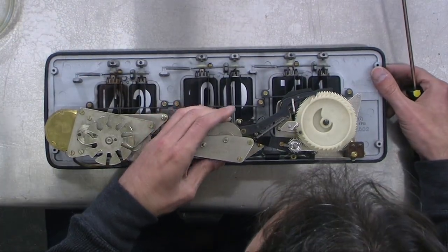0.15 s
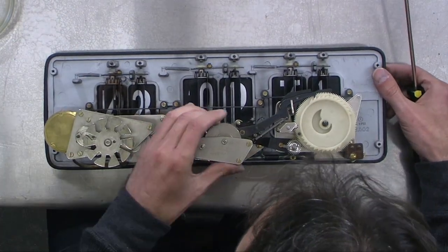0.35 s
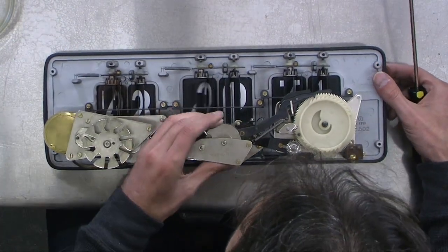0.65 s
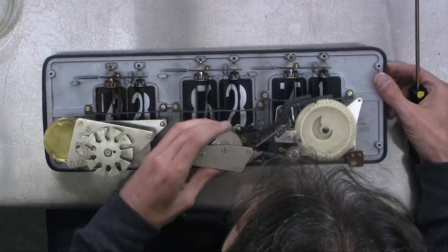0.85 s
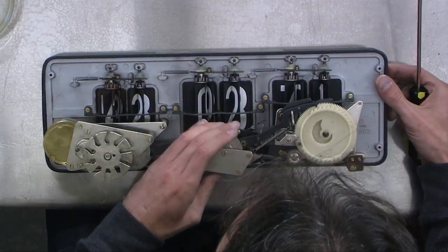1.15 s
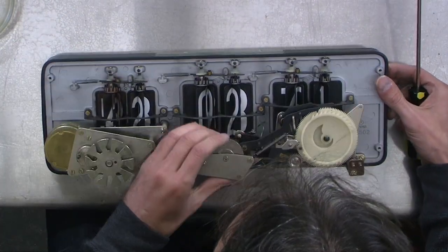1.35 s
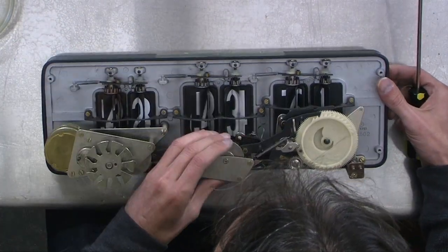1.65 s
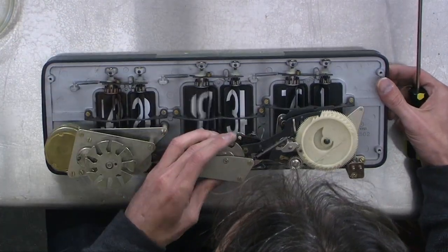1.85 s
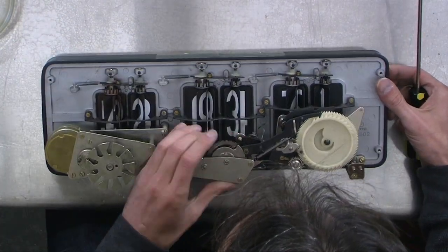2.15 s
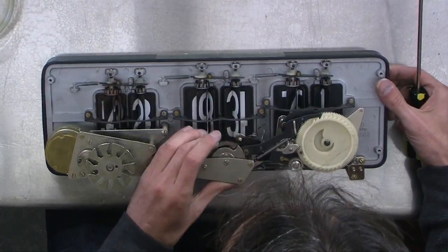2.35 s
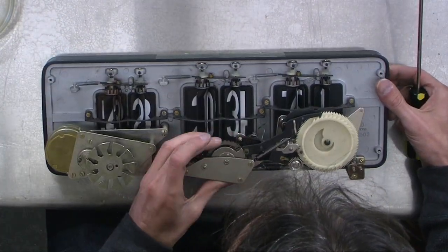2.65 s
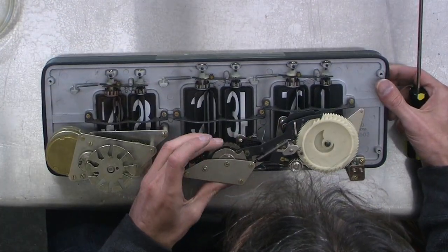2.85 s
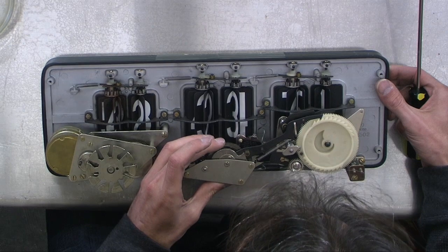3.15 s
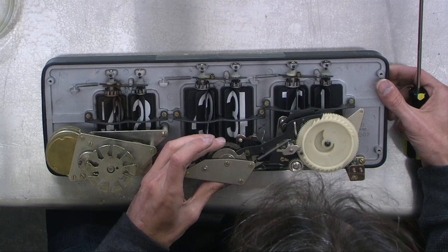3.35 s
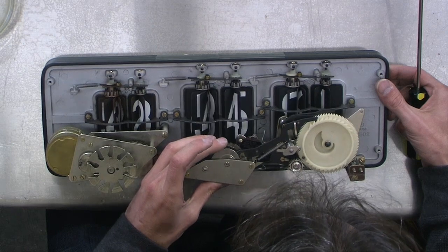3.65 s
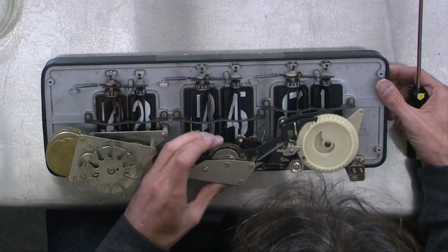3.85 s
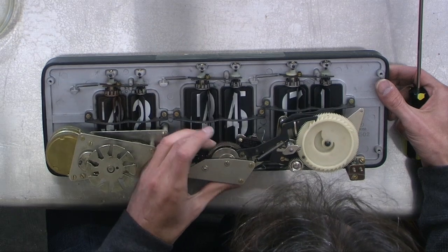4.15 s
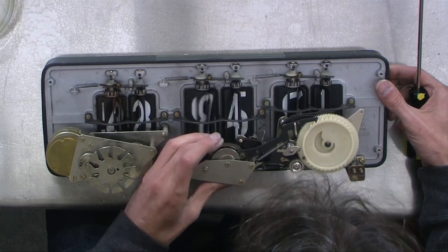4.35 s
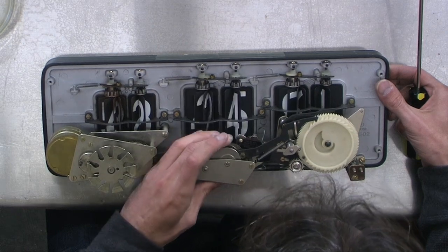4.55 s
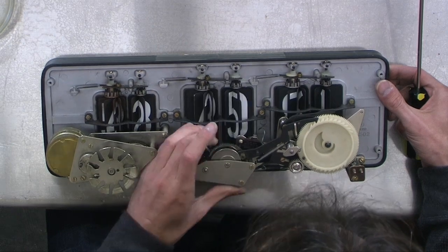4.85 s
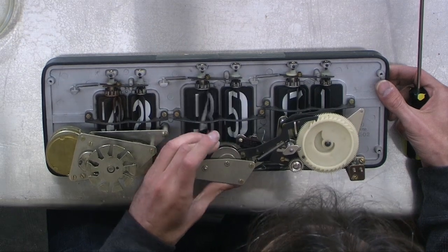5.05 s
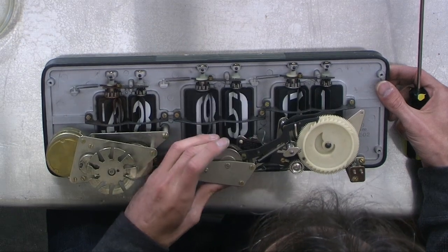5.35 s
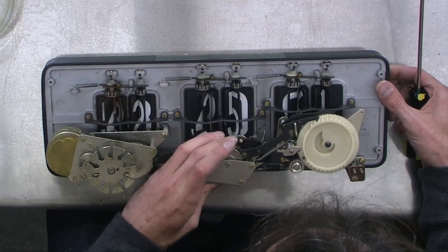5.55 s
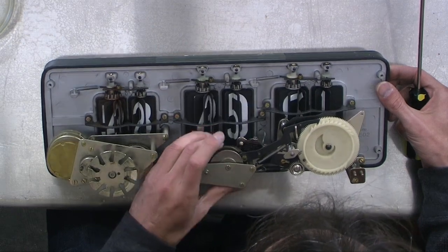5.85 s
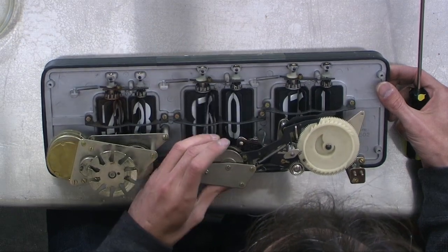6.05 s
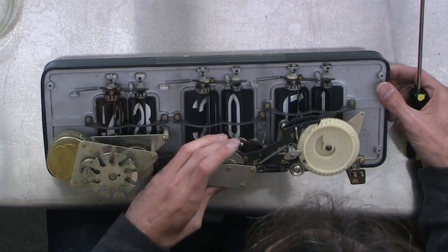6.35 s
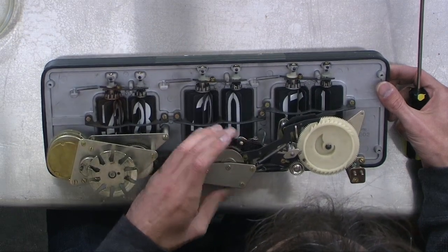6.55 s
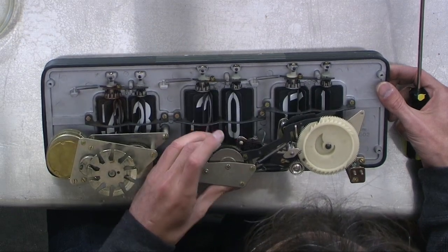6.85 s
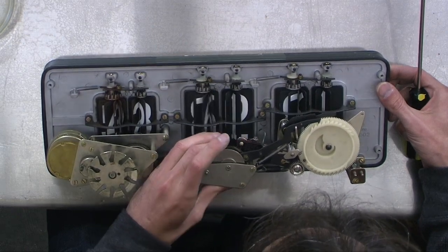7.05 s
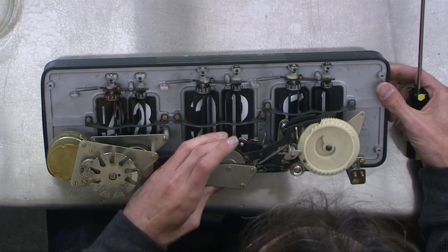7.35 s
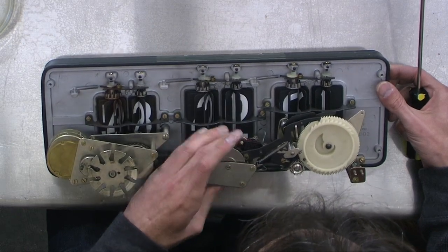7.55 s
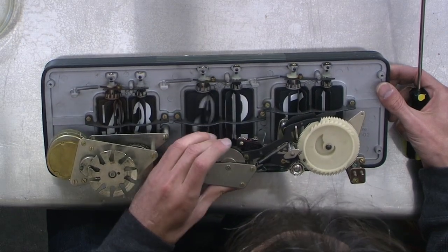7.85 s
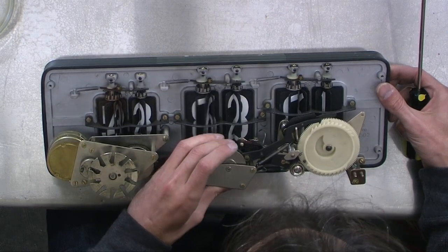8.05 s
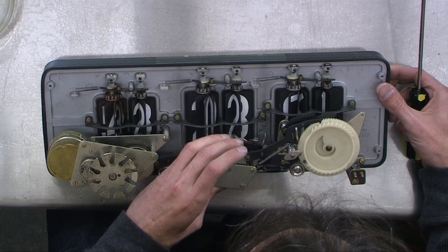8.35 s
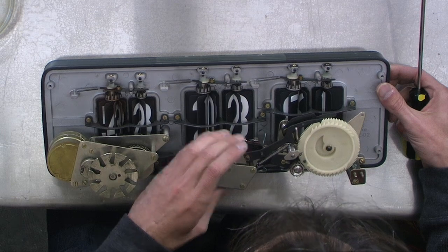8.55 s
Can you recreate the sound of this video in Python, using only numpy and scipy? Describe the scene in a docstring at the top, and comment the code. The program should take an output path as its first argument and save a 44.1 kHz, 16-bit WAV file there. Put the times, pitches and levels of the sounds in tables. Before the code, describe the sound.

Close up, an old flip clock is turned by hand in about eight short spurts. Each one is a rapid run of sharp ticks and light knocks, as cards snap free and land over rattling gears. After the third, shorter spurt, a lever drops with a single hollow clack, and then the spurts resume regularly. Faint hum and hiss of a lively room fill the brief pauses.

```python
"""Short bursts of rattling and clicking: a hand spins the setting wheel of an open split-flap clock.
Gears and levers rattle, cards snap off their stop and land, and once a big lever clacks.
Each blow ticks in the thin parts, knocks in the frame and leaves a slow, deep swing.
The clock stands on a table in a lively room with a faint hum."""
import sys
import numpy as np
from scipy import signal
from scipy.fft import rfft, irfft
from scipy.io import wavfile

SR = 44100
rng = np.random.default_rng(int(sys.argv[2]) if len(sys.argv) > 2 else 0)


def wav_out(sig):
    """Save sig, one row per channel (or a flat mono array), as 16-bit PCM at SR to the path in sys.argv[1]."""
    wavfile.write(sys.argv[1], SR, np.round(np.clip(np.atleast_2d(sig).T, -1, 1) * 32767).astype(np.int16))


N = 383810

# The tones (modes) that cards, springs and levers ring at:
# f/Hz, width/Hz, level/dB, boost with contact time/(dB per ms)
TICK_MODES = [(2440, 354, -14, 3), (2924, 925, -7, 3), (4210, 535, -13.5, 3), (4720, 476, -8.5, 1.1),
              (5415, 730, -0.5, 0.45), (6010, 900, 0.5, 0.43), (7526, 590, 4, -0.09), (8440, 570, 0, 1.05),
              (9500, 920, -1.5, 2), (9930, 416, -5.5, 2), (11800, 1320, 1, 2.5)]
# The tones of the frame; the three narrow ones are the long, faint ring of the back plate:
# f/Hz, width/Hz, level/dB, boost with hollowness/(dB per dB)
KNOCK_MODES = [(314, 22.6, -27, 0.27), (603, 147, -13.5, -0.04), (640, 150, -8, 0), (971, 135, -1.5, 1.17),
               (945, 3, -39, 1.4), (972, 2.5, -36, 1.4), (1000, 3, -39, 1.4), (1140, 337, -5, 0.02),
               (1505, 220, 2, 0), (1708, 134, -5, 0.73), (1778, 180, -9, 0.5), (2970, 142, -14.5, 0),
               (3443, 246, -8, -0.5)]


def from_db(db):
    """Turns decibels into a factor to multiply by."""
    return 10 ** (np.asarray(db) / 20)


def rms_one(x):
    """Scales a sound to an average strength (rms) of 1."""
    return x / np.sqrt(np.mean(x ** 2) + 1e-20)


def at_hz(points, hz):
    """Reads between the rows of a table of f/Hz and value, with all octaves equally wide."""
    row_hz, values = np.transpose(points)
    return np.interp(np.log(hz), np.log(row_hz), values)


def resonance(x, hz, width_hz):
    """Rings at one pitch when pushed by x; the narrower the width, the longer the ring."""
    decay, angle = np.exp(-np.pi * width_hz / SR), 2 * np.pi * hz / SR
    return signal.lfilter([.5, 0, -.5], [1, -2 * decay * np.cos(angle), decay * decay], x + 1e-18)


def smooth(x, hz):
    """Softens whatever is faster than hz."""
    decay = np.exp(-2 * np.pi * hz / SR)
    return signal.lfilter([1 - decay], [1, -decay], x)


def wheel_turning(rise_db_per_s=135, fall_db_per_s=59, rest_db=-70.5, rest_knock_db=2.0):
    """The rattle's level and share of knock: it swells quickly, holds as the hand turns, then fades."""
    # Turns of the wheel: start/s, end/s, rattle level/dB, knock above tick/dB
    turns = [(0.0,0.06,-63.5,9.5),(0.752,1.144,-57,3.5),(1.69,2.065,-58,6.5),(2.756,2.817,-60,1.5),(3.66,3.804,-65,12),(4.44,4.79,-57,5.5),(5.3,5.73,-58,4),(6.217,6.577,-59.5,6),(7.143,7.55,-58.5,6.5),(8.072,8.478,-58.5,6)]
    t = np.arange(N) / SR
    rattle_db, knock_db = np.full(N, rest_db), np.full(N, rest_knock_db)
    for start, end, held_db, turn_knock_db in turns:
        turn_db = held_db - rise_db_per_s * np.maximum(start - t, 0)
        turn_db -= fall_db_per_s * np.maximum(t - end, 0)
        knock_db = np.where(turn_db > rattle_db, turn_knock_db, knock_db)
        rattle_db = np.maximum(rattle_db, turn_db)
    return rattle_db, knock_db


def rattle(max_touches_per_s):
    """Gear teeth and loose cards rub and touch at random while the wheel turns."""
    rattle_db, knock_db = wheel_turning()
    pace = np.minimum(from_db(rattle_db + 53.5), 1)  # slower turning, fewer touches
    sizes = from_db(3.8 * np.minimum(rng.exponential(1, N), 4)) * rng.choice([-1, 1], N)
    touches = sizes * (rng.random(N) < max_touches_per_s * pace / SR)
    half = rng.integers(0, 2, N)  # each touch reaches half of the tones
    tick, knock = np.zeros((2, N))
    for sound, modes in (tick, TICK_MODES), (knock, KNOCK_MODES):
        for k, (hz, width_hz, db, _) in enumerate(modes):
            sound += from_db(db) * resonance(touches * (half == k % 2), hz, width_hz)
    return from_db(rattle_db) * (rms_one(tick) + from_db(knock_db) * rms_one(knock))


def air(noise_db=-55, hum_db=-65):
    """The room's steady rumble and hiss, with a wavering hum."""
    # The colour of the room's noise: f/Hz, relative level/dB
    colour = [(20, -1), (60, -11), (130, -13), (330, -15), (800, -16), (1200, -17), (3100, -26),
              (7000, -28), (11500, -27.5)]
    hz = np.maximum(np.fft.rfftfreq(N, 1 / SR), 1)
    noise = irfft(rfft(rng.standard_normal(N)) * from_db(at_hz(colour, hz)), N)
    hum = resonance(rng.standard_normal(N), hz=178.4, width_hz=18)
    return from_db(noise_db) * rms_one(noise) + from_db(hum_db) * rms_one(hum)


def landings():
    """Blows of cards landing and levers dropping; more tick than knock means a shorter contact."""
    # Each landing: t/s, tick/dB, knock/dB
    drops = [(0.048,-48.5,-42),(0.0564,-46.5,-53),(0.318,-56,-43),(0.6028,-54,-49),(0.6698,-52,-42),(0.7033,-37,-38),(0.735,-57,-30),(0.744,-37,-38),(0.8074,-26,-36),(0.8163,-41,-27),(0.8344,-32,-27.5),(.92,-30,-28.5),(0.964,-33,-29.5),(1.0201,-31.5,-35),(1.0623,-28,-24.5),(1.1142,-29,-26),(1.2652,-54,-41.5),
             (1.6126,-55,-38),(1.6283,-43,-32),(1.639,-34,-28),(1.646,-42,-35),(1.663,-52,-37),(1.6858,-28,-28),(1.7006,-29,-40),(1.7356,-30,-26),(1.7429,-24.5,-33),(1.75,-26,-41),(1.765,-39,-33),(1.771,-33,-25),(1.8256,-41,-33),(1.936,-32,-33),(2.0395,-29,-28),(2.1375,-44,-41),
             (2.5887,-60,-48),(2.623,-40,-50),(2.628,-46,-37),(2.645,-32.5,-37),(2.708,-41,-39),(2.744,-43,-42),(3.1792,-38,-33.5),
             (4.3038,-50,-43),(4.3308,-47,-37),(4.3581,-32.5,-31),(4.3758,-34,-31),(4.4439,-31,-33),(4.489,-36,-32),(4.5484,-32,-28),(4.584,-35,-43),(4.612,-35,-49),(4.6213,-32,-22.5),(4.668,-33,-33),(4.73,-31,-46),(4.745,-32.5,-27.5),(4.77,-35,-26.5),(4.8323,-46,-35),
             (5.09,-61,-48.5),(5.1892,-40,-39.5),(5.2146,-35,-33),(5.2417,-34,-39),(5.2562,-41,-35),(5.2924,-35,-38),(5.3508,-32,-40),(5.3773,-42,-28),(5.4292,-37,-33),(5.4747,-32,-42),(5.4877,-34,-28.5),(5.521,-39,-41),(5.5249,-43,-30),(5.561,-35,-37),(5.573,-35,-27),(5.589,-29,-29.5),(5.6058,-34,-40),(5.689,-45,-30),(5.769,-46,-36),
             (6.0068,-54,-43.5),(6.037,-59,-39),(6.06,-37,-32),(6.0683,-33.5,-35),(6.0757,-38,-30),(6.1094,-36,-40),(6.1174,-38,-33),(6.152,-44,-35),(6.1664,-38,-39),(6.2076,-34,-38),(6.23,-40,-30),(6.2878,-34,-29.5),(6.3204,-31,-43),(6.3981,-34,-35),(6.431,-35,-42),(6.4415,-49,-27),(6.495,-32,-31),(6.5343,-46,-31),(6.6531,-43,-36.5),(6.727,-59,-46),(6.8178,-54,-43),(6.829,-62,-45),(6.879,-56,-54),
             (7.0338,-30,-40),(7.0432,-33,-28.5),(7.059,-33,-37),(7.0678,-31,-26.5),(7.1052,-45,-35),(7.1216,-36,-28),(7.1403,-38,-29),(7.1727,-34,-42),(7.1892,-39,-38.5),(7.2312,-36,-39),(7.255,-49,-31),(7.29,-33,-56),(7.3106,-37,-32),(7.323,-42,-51),(7.3417,-32,-45),(7.429,-36,-27),(7.4635,-34.5,-33),(7.5643,-73,-33),(7.576,-35.5,-51),(7.672,-41.5,-33.5),(7.6797,-42,-41),(7.903,-56,-46),(7.9465,-54,-43),
             (8.0,-31.5,-40),(8.0093,-34,-29.5),(8.016,-47,-30.5),(8.036,-28.5,-28),(8.0685,-47,-28),(8.098,-34,-33.5),(8.151,-36,-34),(8.2122,-31,-54),(8.2378,-40,-32),(8.313,-32.5,-36),(8.3726,-36,-37),(8.3979,-48,-41.5),(8.4572,-30.5,-26.5),(8.5171,-35,-35),(8.6483,-42.5,-37.5)]
    t, tick_db, knock_db = np.transpose(drops)
    swing_db = tick_db - 8.5
    contact_ms = 5.44 * np.exp(0.031 * (knock_db - tick_db))
    hollow_db = np.clip(-1.1 * (knock_db + 31.5), -2.5, 2.5)  # lighter landings sound more hollow
    return t, tick_db, knock_db, swing_db, contact_ms, hollow_db


def card_snaps():
    """Blows of cards snapping off their stop."""
    # Each snap: t/s, tick/dB, low swing/dB, contact/ms
    snaps = [(0.092,-23.5,-31.5,2.84),(0.2,-34.5,-39,8.6),(0.717,-23.5,-35,3.1),(0.7607,-22,-31,3.3),(0.799,-18,-31,2),(0.845,-16,-32.5,2.5),(0.8625,-15,-32,0.61),(.871,-18,-39,2.7),(0.912,-36,-37,2.3),(0.9548,-24.5,-34.5,4.2),(0.9958,-23,-34,3),(1.0492,-21,-28.5,3.3),(1.0973,-22,-31,3.5),(1.1464,-18,-26,2.2),
             (1.6785,-28.5,-31,4.5),(1.7117,-20,-31.5,2.4),(1.7264,-26,-46,3.2),(1.7842,-12,-25,3.15),(1.8175,-9.5,-25,0.36),(1.8435,-18.5,-29,1.8),(1.8832,-29,-37,8.4),(1.9165,-19.5,-30.5,3.1),(1.9629,-19,-32.5,2),(1.9897,-27,-39,2.6),(2.0146,-17,-26.5,2.6),(2.0725,-14.5,-24.5,1.73),
             (2.679,-20,-28,2.5),(2.7378,-31,-34.5,4.1),(2.7715,-22,-34,2),(2.843,-34.5,-47,4.7),(2.894,-30,-34.5,4.3),(2.9135,-25,-37.5,2.6),(3.099,-32.5,-36,4.9),(3.1944,-29,-36.5,7.4),(3.2362,-23,-29,1.7),(3.622,-11,-27.5,1.17),
             (4.386,-21,-32,1.85),(4.4261,-25,-31,3.2),(4.479,-28.5,-33,5),(4.5213,-16.5,-30,2),(4.5602,-21,-30.5,2.4),(4.598,-22.5,-29,2.4),(4.6325,-21,-35,2.4),(4.66,-19.5,-32,1.7),(4.712,-20,-33.5,1.3),(4.7882,-17,-35.5,1.9),(4.8019,-14.5,-34,0.63),
             (5.263,-22.5,-34,1.9),(5.308,-25,-33.5,3.4),(5.3564,-25,-33.5,1.2),(5.4192,-20,-29,2.8),(5.48,-21,-31.5,2.1),(5.534,-19.5,-29.5,2.2),(5.583,-23.5,-34.5,1.9),(5.621,-22,-33.5,1.8),(5.6707,-22,-32,3),(5.737,-19.5,-31.5,1.2),
             (6.0942,-18.5,-32,2),(6.1275,-24.5,-32.5,2.7),(6.1763,-16.5,-31,1.7),(6.2186,-21,-32,1.6),(6.2738,-18,-29,2.6),(6.3363,-17.5,-28.5,2.3),(6.3814,-20.5,-30,1.8),(6.4521,-21,-36,1.6),(6.5039,-24.5,-31.5,2.6),(6.5926,-21,-32.5,1.8),
             (7.087,-18.5,-29,2.3),(7.0944,-17,-45,0.74),(7.1336,-19.5,-30.5,0.65),(7.1936,-21,-31.5,2.3),(7.2379,-25,-35,2),(7.2958,-18,-28,2.8),(7.358,-19.5,-29.5,2.3),(7.4084,-20.5,-28,2.4),(7.4796,-23.5,-34.5,2.5),(7.528,-28,-37,2),(7.5345,-22.5,-33,2.14),(7.6086,-19.5,-31.5,2.36),
             (8.0563,-20.5,-32,3.2),(8.0627,-14.5,-34,1.7),(8.1176,-19.5,-29.5,1.6),(8.167,-23.5,-33,3.8),(8.222,-22,-33.5,2.2),(8.2874,-16.5,-28,2.2),(8.3498,-30,-42,1.2),(8.3631,-19,-31.5,2.8),(8.437,-17.5,-28.5,1.7),(8.5102,-20.5,-32,1.1)]
    t, tick_db, swing_db, contact_ms = np.transpose(snaps)
    knock_db = -24 + 0.53 * (swing_db + 29.5)  # a heavier snap knocks harder
    knock_db += 0.28 * np.minimum(tick_db + 23.5, 0)  # a light tick knocks less
    hollow_db = np.full(len(t), -8)
    return t, tick_db, knock_db, swing_db, contact_ms, hollow_db


def lever_clack():
    """Blows of the big lever as it clacks home and bounces."""
    # Each hit of the lever: t/s, tick/dB, knock/dB, contact/ms, hollowness/dB
    hits = [(3.5578,-31,-39,2.5,0),(3.5606,-34.5,-31,8.1,-8),(3.571,-26,-28,3,-4),(3.5757,-18,-18,4.7,2.5),(3.5829,-22.5,-23,12,2),(3.5913,-19,-21,4.4,12),(3.599,-30,-23,5.4,-11),(3.6034,-18.5,-21,2.5,-2),(3.609,-26,-39,3.2,-8),(3.6321,-40,-20.5,4.9,1),(3.658,-44,-27,5.3,6),(3.67,-45,-32,6.8,3),(3.6964,-51,-48,4.6,13),(3.708,-58,-51,7.2,12),(3.731,-60,-50,6.1,1),(3.7492,-60,-54,6.6,9),(3.7862,-62,-52,7.2,16),(3.8097,-63,-48,8.4,6)]
    t, tick_db, knock_db, contact_ms, hollow_db = np.transpose(hits)
    swing_db = tick_db - 16
    return t, tick_db, knock_db, swing_db, contact_ms, hollow_db


def contact_force(contact_ms, bounce_ms=6.5):
    """One row of force per blow: a first touch, tiny uneven touches dying away, and one bounce."""
    ms = np.arange(800) / SR * 1000
    size = len(contact_ms), len(ms)
    touches = rng.standard_normal(size) * rng.exponential(1, size)
    progress = ms / contact_ms[:, None]
    force = touches * np.minimum(progress * 2.7 + 0.08, 1) * np.exp(-2.2 * progress)
    force /= np.sqrt(np.sum(force ** 2, axis=1, keepdims=True))
    first_touch = 4 * (ms == 0) / contact_ms[:, None] ** 2  # short contacts begin sharply
    bounce = from_db(-19) / 12 * np.exp(-((ms - bounce_ms) / 10.3) ** 2) * touches
    return force + first_touch + bounce


def struck(modes, t, level_db, character, force, scatter_db=1.5):
    """Each blow rings all of a part's tones; its character and a little chance set their mix."""
    steps = np.arange(force.shape[1])
    samples = (np.round(t * SR).astype(int)[:, None] + steps).ravel()
    chance_db = scatter_db * rng.standard_normal((len(t), len(modes)))
    sound = np.zeros(N)
    for k, (hz, width_hz, mode_db, boost) in enumerate(modes):
        near_hz = hz + width_hz * np.array([-.5, 0, .5])
        force_near = np.abs(force @ np.exp(2j * np.pi * np.outer(steps, near_hz) / SR))
        gain = from_db(level_db + mode_db + boost * character + chance_db[:, k])
        gain /= np.sqrt(np.mean(force_near ** 2, axis=1) + .05)  # even out the force near this tone
        drive = np.bincount(samples, (gain[:, None] * force).ravel(), N)[:N]
        sound += (-1) ** k * resonance(drive, hz, width_hz)
    return sound


def ticks_and_knocks(t, tick_db, knock_db, contact_ms, hollow_db):
    """The same force makes the thin parts tick and the frame knock."""
    force = contact_force(np.clip(contact_ms, .5, 10))
    ticks = struck(TICK_MODES, t, tick_db - 5, np.minimum(contact_ms, 5), force)
    knocks = struck(KNOCK_MODES, t, knock_db, np.clip(hollow_db, -12, 12), force)
    return ticks + knocks


def low_swing(t, swing_db):
    """After each blow: a short push, a long sag, and a slowing wobble as a bass cut recovers."""
    click = np.arange(SR // 4) == 0
    push = smooth(smooth(click, 190), 190)
    sag = smooth(smooth(push, 9.3), 32.4)
    swing = .016 * push - sag
    for order, hz in (3, 22.7), (1, 12.8):
        swing = signal.sosfilt(signal.butter(order, hz, "high", fs=SR, output="sos"), swing)
    kicks = np.bincount(np.round(t * SR).astype(int), from_db(swing_db), N)
    return signal.fftconvolve(kicks, swing / np.abs(swing).max())[:N]


def room(x, onset_ms):
    """The room's echoes blur into noise, each octave dying away at its own rate."""
    # How long the echoes take to fade by 60 dB: f/Hz, time/s
    fade_times = [(150, 0.74), (500, 1), (1400, 0.21), (3700, 0.87), (9700, 0.1), (13000, 0.068)]
    t, edges_hz = np.arange(SR) / SR, 110 * 2. ** np.arange(8)
    tail = np.zeros(SR)
    for low, high in zip(edges_hz, edges_hz[1:]):
        octave = signal.butter(2, [low, high], "band", fs=SR, output="sos")
        noise = signal.sosfilt(octave, rng.standard_normal(SR))
        tail += noise * from_db(-60 * t / at_hz(fade_times, np.sqrt(low * high)))
    tail *= 1 - np.exp(-1000 * t / onset_ms)
    return signal.fftconvolve(x, tail / np.sqrt(np.sum(tail ** 2)))[:N]


def scene():
    """The clock close by, its echoes, the low swings and the air of the room."""
    blows = np.hstack([card_snaps(), landings(), lever_clack()])
    t, tick_db, knock_db, swing_db, contact_ms, hollow_db = blows
    clock = ticks_and_knocks(t, tick_db, knock_db, contact_ms, hollow_db)
    clock += rattle(max_touches_per_s=2500)
    echoes = from_db(-14) * room(clock, onset_ms=3.3)
    return (clock + echoes + low_swing(t, swing_db) + air())[None]


def record(dry):
    """Cuts the highest treble steeply, to 70 dB down from stop_hz on."""
    stop_hz = 12300 + 500
    return signal.sosfilt(signal.cheby2(14, 70, stop_hz, fs=SR, output="sos"), dry)


dry = scene()
out = record(dry)
wav_out(out)
```